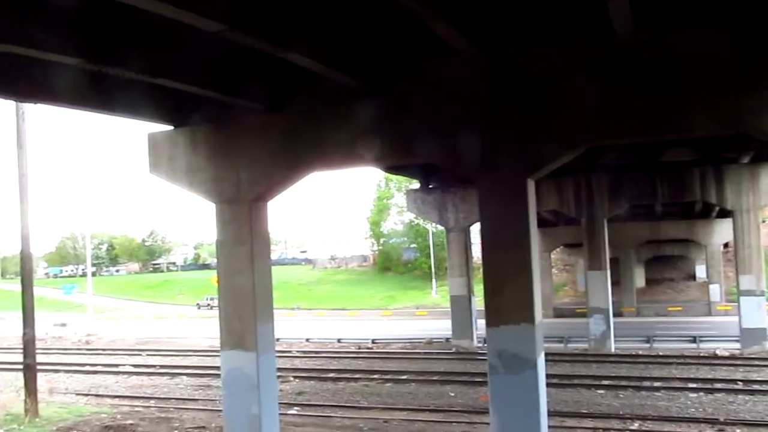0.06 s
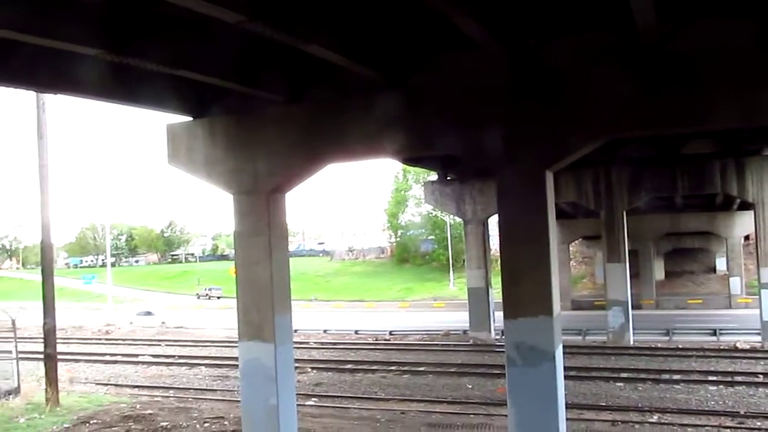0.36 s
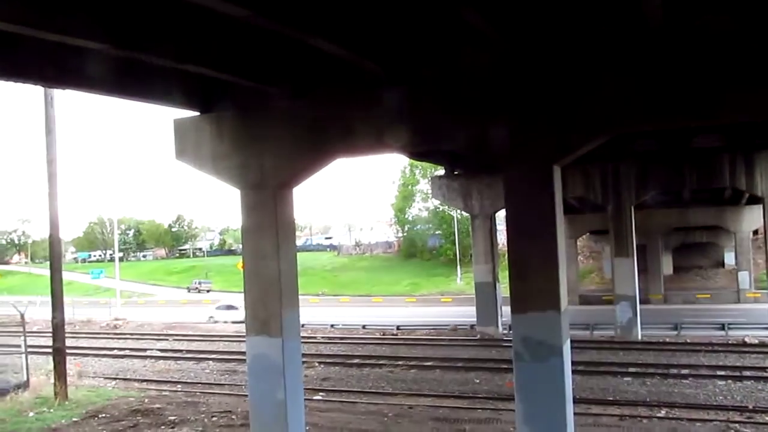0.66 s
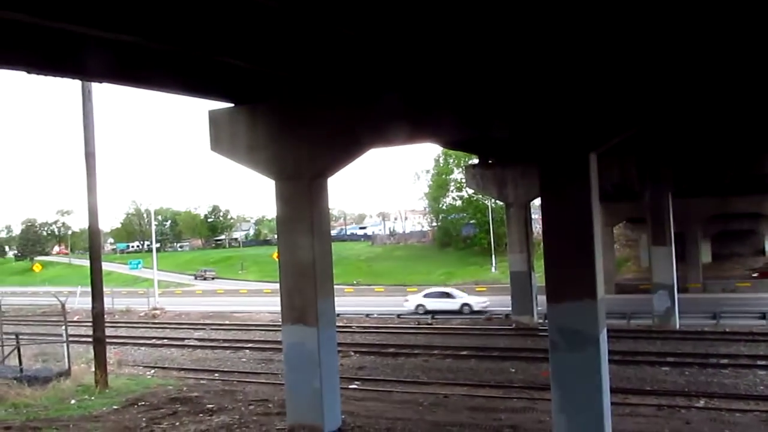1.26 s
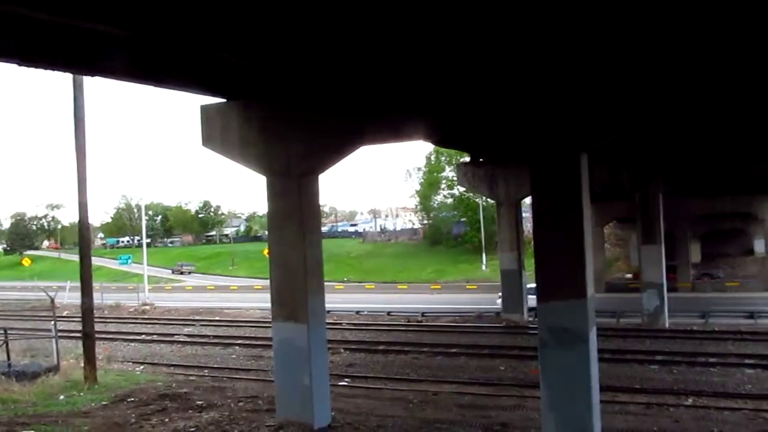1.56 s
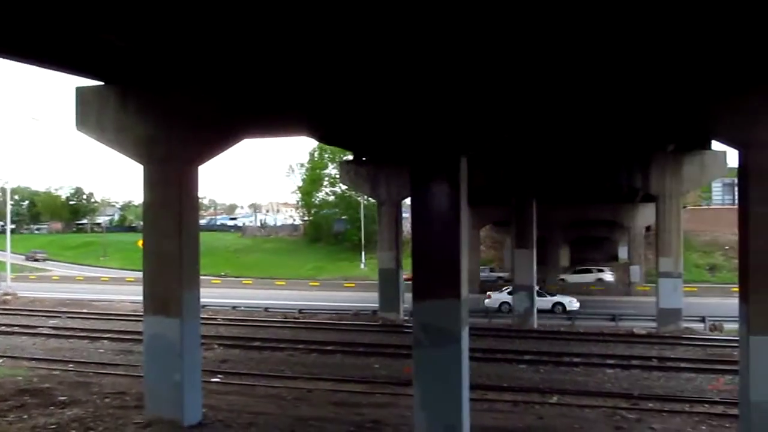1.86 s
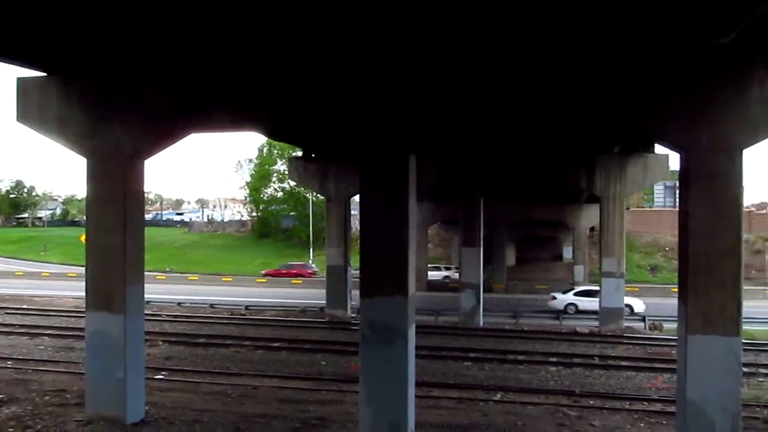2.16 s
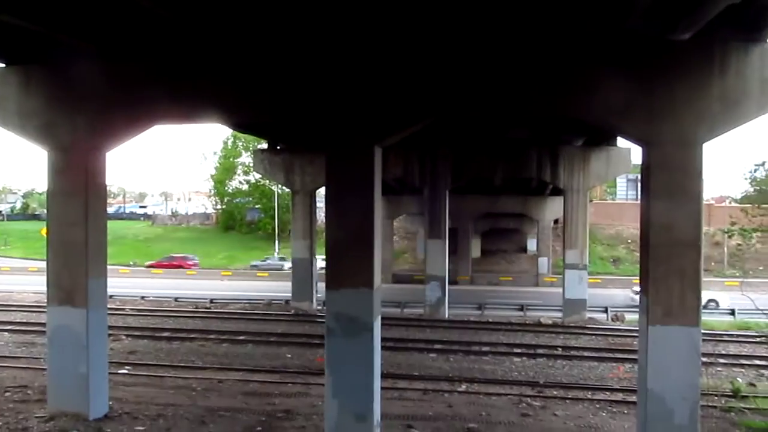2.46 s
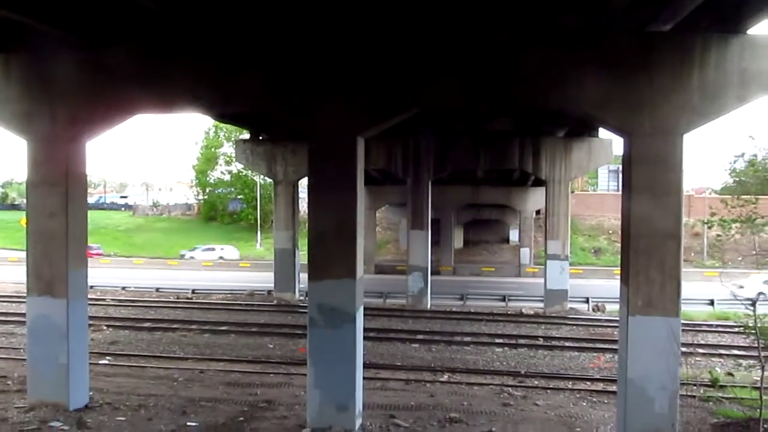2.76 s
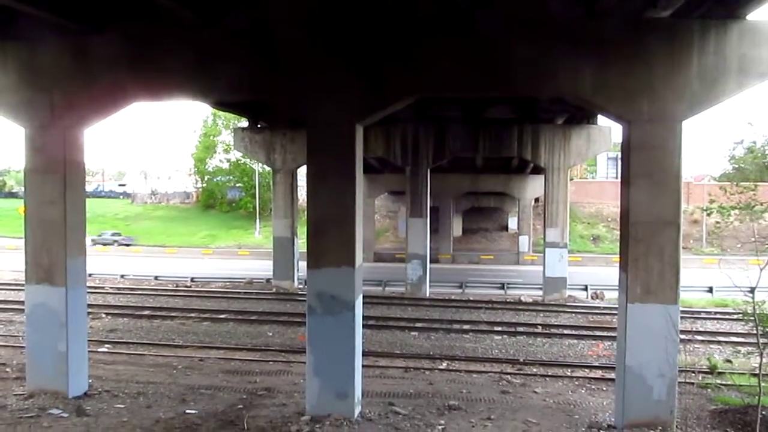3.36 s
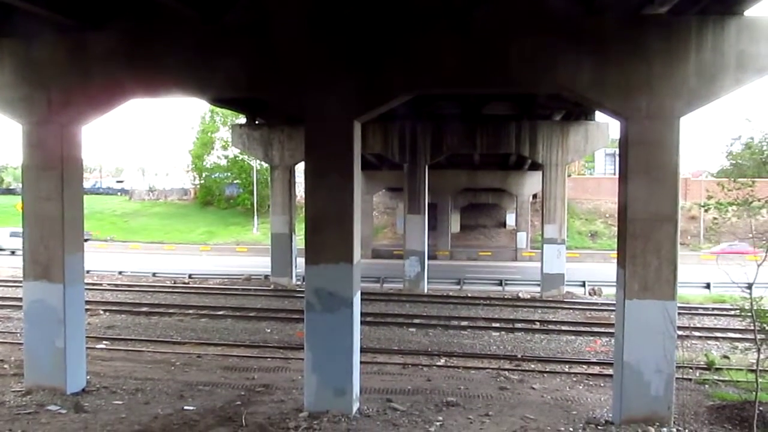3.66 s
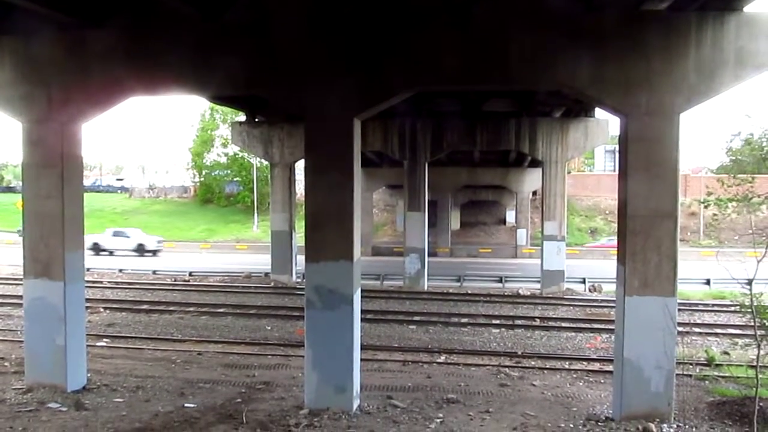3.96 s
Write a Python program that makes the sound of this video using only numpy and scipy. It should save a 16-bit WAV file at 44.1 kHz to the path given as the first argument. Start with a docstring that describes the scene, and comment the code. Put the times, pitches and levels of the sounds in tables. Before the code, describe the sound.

Traffic noise under a concrete bridge: a wide rush of distant tyres over a deep rumble, with dull thumps from wheels above. One car passes on the road beyond the pillars, then a heavy engine grows louder.

```python
"""Road traffic from under a concrete overpass. Distant tyres rush, a far engine drones and the deck
rumbles throughout. From the start, wheels overhead boom across the span and thump over its joints,
with a few tiny ticks in the first second. At two seconds a car's tyres swell past beyond the pillars;
one last thump sets the span swaying, and a whoosh rises from the far lanes. At the end a heavy
engine draws near as a second car approaches."""
import sys
import numpy as np
from scipy import signal
from scipy.fft import rfft, irfft
from scipy.io import wavfile

SR = 44100
rng = np.random.default_rng(int(sys.argv[2]) if len(sys.argv) > 2 else 0)


def file_out(sig):
    """Save sig as 16-bit WAV at sys.argv[1]."""
    # one column per channel
    cols = np.atleast_2d(sig).T
    # limit, then scale
    lim = np.clip(cols, -1, 1)
    pcm = np.round(lim * 32767).astype(np.int16)
    wavfile.write(sys.argv[1], SR, pcm)


N = 176400

# Tyre hiss, near or distant. Each row: frequency in Hz, level in dB.
HISS_SPECTRUM = [(800, -15.5), (2500, 3.5), (4500, -3.5), (7000, -13), (10300, -23.5), (12000, -35.5),
                 (15000, -54)]


def undb(db):
    """Decibels to gain."""
    return 10 ** (np.asarray(db) / 20)


def curve(rows, column=1):
    """An automation lane: one column of a time table, joined by straight lines."""
    rows = np.array(rows)
    return np.interp(np.arange(N) / SR, rows[:, 0], rows[:, column])


def equalise(x, points):
    """An EQ curve drawn through (Hz, dB) points."""
    hz, db = np.array(points).T
    gain_db = np.interp(np.log(np.fft.rfftfreq(N, 1 / SR) + 1), np.log(hz), db)
    return irfft(rfft(x) * undb(gain_db), N)


def noise(spectrum):
    """Coloured noise of rms 1."""
    x = equalise(rng.standard_normal(N), spectrum)
    return x / x.std()


def wander(rate_hz):
    """Smooth random modulation of spread 1, rolling off above rate_hz."""
    count = 1024
    hz = np.fft.rfftfreq(count, N / SR / count)
    x = irfft(rfft(rng.standard_normal(count)) / (1 + (hz / rate_hz) ** 4))
    return np.interp(np.linspace(0, count - 1, N), np.arange(count), x / x.std())


def pan_left(x, db):
    """Lean a sound to the left by db."""
    return x * undb(np.array([[db], [-db]]) / 2)


def tyres(spectrum):
    """Tyre noise with a faint waver in level; echoes off the concrete spread the treble wide."""
    # Stereo width. Each row: frequency in Hz, gain of the side signal in dB.
    width = [(60, -31.5), (125, -19.5), (250, -16.5), (500, -15.5), (1000, -8.5), (2000, -4.5), (4000, 0),
             (10000, 0.5)]
    mid, side = noise(spectrum), equalise(noise(spectrum), width)
    return np.array([mid + side, mid - side]) * undb(0.19 * wander(rate_hz=3.9))


def distant_traffic():
    """The bed: many distant tyres blur into a rush, with hiss coming and going on top."""
    # Tone of the rush. Each row: frequency in Hz, level in dB.
    rush_spectrum = [(150, 0.5), (300, -4), (450, -4), (700, -2), (1100, -2.5), (1450, -4), (2000, -8),
                     (3000, -20), (4500, -31), (5800, -39.5), (7000, -41), (10000, -60.5), (15000, -68)]
    # Fader rides for rush and hiss. Each row: time in seconds, level in dB.
    rush_level = [(0, -24.5), (.09, -26.5), (.18, -28.5), (.55, -25.5), (1.1, -26), (1.5, -22.5),
                  (1.85, -25), (2.6, -22.5), (3.2, -23), (3.55, -22), (4, -21.5)]
    hiss_level = [(0, -56), (.2, -64), (.7, -48.5), (1.1, -47.5), (1.42, -42), (1.65, -49), (2.1, -40.5),
                  (2.8, -53), (3.35, -45), (3.75, -44), (4, -44)]
    rush = tyres(rush_spectrum) * undb(curve(rush_level))
    return rush + tyres(HISS_SPECTRUM) * undb(curve(hiss_level))


def far_cars():
    """Tyre tread on the far lanes: a midrange whoosh that swells and eases off."""
    # Tread roar. Each row: frequency in Hz, level in dB.
    tread_spectrum = [(300, -40), (520, -20), (720, -7.5), (1100, 0), (1400, -2.5), (1750, -13.5),
                      (3000, -25.5), (12000, -69)]
    nearest_s, half_width_s, peak_db = 3.32, 0.9, -25.5
    t = np.arange(N) / SR
    return tyres(tread_spectrum) * undb(peak_db) / (1 + ((t - nearest_s) / half_width_s) ** 2)


def deck_rumble():
    """Traffic overhead keeps the deck rumbling, and wheels boom as they roll across the span."""
    # Tone of rumble and boom. Each row: frequency in Hz, level in dB.
    rumble_spectrum = [(10, -2), (25, -21), (42, 10), (58, -7.5), (82, 4), (102, -3.5), (150, -6.5),
                       (220, -7.5), (300, -12), (500, -27.5), (4000, -110)]
    boom_spectrum = [(25, -26), (42, 5.5), (52, 6), (63, -4.5), (80, -1), (92, -7), (110, -16.5),
                     (200, -38), (243, -10), (280, -25), (500, -41), (4000, -110)]
    # Their fader rides. Each row: time in seconds, level in dB.
    rumble_level = [(0, -20.5), (.65, -25), (1.15, -21.5), (1.36, -24), (1.55, -21), (1.82, -20.5),
                    (2.2, -20.5), (2.4, -23), (2.7, -20.5), (3.25, -21.5), (3.6, -26.5), (4, -29)]
    boom_level = [(0, -28.5), (.14, -17.5), (.33, -18.5), (.41, -30), (.47, -18.5), (.68, -21.5), (.8, -22),
                  (1.01, -17.5), (1.08, -28.5), (1.38, -19), (1.6, -27), (4, -50)]
    rumble = noise(rumble_spectrum) * undb(curve(rumble_level))
    return rumble + noise(boom_spectrum) * undb(curve(boom_level))


def engine_note(track, overtones, scatter, flutter_hz):
    """A firing note and its overtones; shifting echoes under the deck make each one waver."""
    phase = 2 * np.pi * np.cumsum(curve(track)) / SR

    def partial(multiple):
        echoes = scatter * (wander(flutter_hz) + 1j * wander(flutter_hz))
        return ((1 + echoes) * np.exp(1j * multiple * phase)).real

    gain, overtone_gain = undb(curve(track, column=2)), undb(curve(track, column=3))
    note = partial(1) + overtone_gain * sum(undb(db) * partial(k) for k, db in overtones)
    return note * np.sqrt(2 / (1 + 2 * scatter ** 2)) * gain


def far_engine():
    """A far engine holds a low drone, wavering deeply in the echoes."""
    # The drone. Each row: time in seconds, firing rate in Hz, level in dB, overtone gain in dB.
    track = [(0, 124.4, -32.5, 2), (.65, 122.2, -26.5, -14.5), (1, 121.5, -28.5, 0.5),
             (1.65, 121, -25.5, -7.5), (2.35, 118.8, -24, -7), (3, 118.5, -27, -10),
             (4, 120.2, -32.5, -7.5)]
    # Its overtones. Each row: multiple of the firing rate, level in dB.
    overtones = [(2, 0), (3, -11.5)]
    return engine_note(track, overtones, scatter=0.55, flutter_hz=5.5)


def heavy_engine():
    """A heavy engine draws near: its firing note and exhaust roar grow together."""
    # The approach. Each row: time in seconds, firing rate in Hz, level in dB, overtone gain in dB.
    track = [(0, 126, -77, -8), (3.2, 130, -38.5, -18), (3.55, 128, -23.5, -8.5), (3.75, 128.5, -21, -19),
             (3.84, 129.5, -18.5, -13.5), (3.93, 128.5, -14.5, -13), (4, 127.8, -15.5, -17)]
    # Its overtones. Each row: multiple of the firing rate, level in dB.
    overtones = [(2, 3.5), (3, -15), (4, -12.5)]
    # Exhaust roar. Each row: frequency in Hz, level in dB.
    exhaust_spectrum = [(60, -26), (150, 4), (215, 1.5), (290, 1), (370, -19), (1000, -25.5), (6000, -90)]
    exhaust = noise(exhaust_spectrum) * undb(curve(track, column=2) - 10.5)  # dB under the note
    return engine_note(track, overtones, scatter=0.089, flutter_hz=8) + exhaust


def ticks():
    """Tiny clicks, each a spike of bright noise."""
    # The clicks. Each row: peak time in seconds, level in dB, rise and decay time in seconds.
    clicks = [(.092, -38, 0.00035), (0.1012, -39, 0.00028), (.908, -43.5, .0025), (.990, -53, .002)]
    # Their tone. Each row: frequency in Hz, level in dB.
    tick_spectrum = [(2500, -23), (5400, 5), (9500, -3), (13500, -10), (16000, -26)]
    t = np.arange(N) / SR
    spikes = sum(undb(db) * np.exp(-abs(t - when) / decay) for when, db, decay in clicks)
    return noise(tick_spectrum) * spikes


def deck_ring(age, hz, t60):
    """One resonance of the struck deck: a sine with a soft attack, dying by 60 dB in t60 seconds."""
    attack_s = 0.0085
    envelope = np.exp(-np.log(1000) * age / t60) * (1 - np.exp(-age / attack_s))
    return -np.sin(2 * np.pi * hz * age) * envelope


def deck_thumps():
    """A wheel pushes the deck down and lets it go; the span sways, the joint rings, the tyre slaps."""
    # Wheels on joints. Each row: time in seconds, push pitch in Hz, then thump, sway and knock in dB.
    wheels = [(.096, 44.4, 0, -27, -24), (0.246, 54, -11, -28, -36), (.775, 50, -3.5, -26, -22.5),
              (.908, 81, -9, -36, -36), (1.132, 56, -7, -28, -39), (1.81, 45, -10, -24, -40),
              (2.487, 42, -14.5, -10.5, -30)]
    # Ring of joint and girders. Each row: frequency in Hz, level in dB, seconds to fall by 60 dB.
    joint_modes = [(75, 11, 0.059), (125, -9.5, 0.39), (230.6, -2, 0.27), (340.4, 1, 0.54),
                   (455, -13, 0.23), (543, 4, 0.11)]
    # Tyre slap. Each row: frequency in Hz, level in dB.
    slap_spectrum = [(60, -8), (170, -3.5), (350, -5), (520, -3), (740, -5), (980, -16.5), (1500, -24),
                     (8000, -73)]
    span_hz, span_t60_s = 40.7, 0.99
    push_width_cycles, joint_detune = 0.38, 0.0071
    slap_db, slap_decay_s = 1.5, 0.024
    t, out = np.arange(N) / SR, 0
    slap_noise = undb(slap_db) * noise(slap_spectrum)
    for when, push_hz, thump_db, sway_db, knock_db in wheels:
        cycles, age = push_hz * (t - when), np.maximum(t - when, 0)
        push = -np.sin(2 * np.pi * cycles) * np.exp(-(cycles / push_width_cycles) ** 2 / 2)
        sway = deck_ring(age, span_hz, span_t60_s)
        joint = sum(undb(db) * deck_ring(age, hz * (1 + joint_detune * rng.standard_normal()), t60)
                    for hz, db, t60 in joint_modes)
        slap = slap_noise * np.exp(-abs(t - when) / slap_decay_s)
        out = out + undb(thump_db) * push + undb(sway_db) * sway + undb(knock_db) * (joint + slap)
    return out


def passing_cars():
    """Tyres on the near road roar and hiss, rising and falling with each car's distance."""
    # The cars. Each row: time when nearest in seconds, speed in m/s, roar level there in dB.
    cars = [(2.03, 19.3, -20.5), (4.15, 30, -26)]
    # Tyre roar. Each row: frequency in Hz, level in dB.
    roar_spectrum = [(150, -7), (370, -2), (500, -3), (750, 2.9), (1100, 1.4), (1600, -3), (2300, -8),
                     (3500, -19), (5500, -31.5), (9500, -54), (15000, -74.5)]
    road_distance_m, hiss_db = 15.8, -18.5
    roar_falloff, hiss_falloff = 2.82, 2.3  # powers of distance, heard between the pillars
    t, out = np.arange(N) / SR, 0
    for when, speed, db in cars:
        along_m = speed * (t - when)
        nearness = road_distance_m / np.hypot(along_m, road_distance_m)
        roar = tyres(roar_spectrum) * nearness ** roar_falloff
        hiss = undb(hiss_db) * tyres(HISS_SPECTRUM) * nearness ** hiss_falloff
        out = out + undb(db) * (roar + hiss)
    return out


def scene():
    """The mix: wide tyre noise over the nearly centred bass of deck and engines."""
    # EQ that dulls the road's left side a touch. Each row: frequency in Hz, gain in dB.
    left_shade = [(500, 0.4), (2000, -1), (8000, -1.5)]
    left, right = distant_traffic() + passing_cars() + far_cars()
    road = np.array([equalise(left, left_shade), right])
    low_end = deck_rumble() + heavy_engine() + far_engine() + deck_thumps()
    return road + pan_left(low_end, db=0.7) + ticks()


def record(dry):
    """The master chain: shed the deepest bass, clip the peaks, cut the top."""
    low_cut_hz, ceiling, high_cut_hz = 6, 0.96, 15700
    low_cut = signal.butter(1, low_cut_hz, "high", fs=SR, output="sos")
    high_cut = signal.ellip(8, 0.2, 70, high_cut_hz, fs=SR, output="sos")
    clipped = np.clip(signal.sosfilt(low_cut, dry), -ceiling, ceiling)
    return signal.sosfilt(high_cut, clipped)


dry = scene()
out = record(dry)
file_out(out)
```